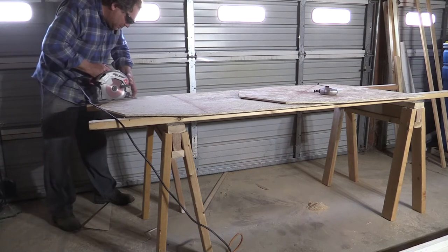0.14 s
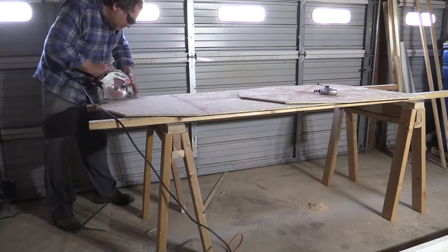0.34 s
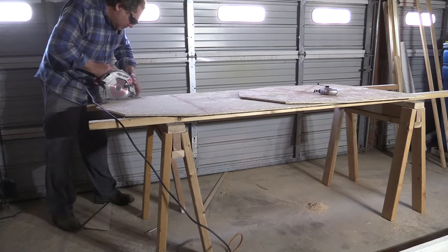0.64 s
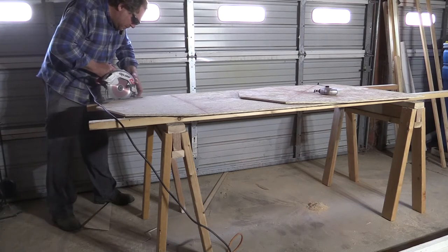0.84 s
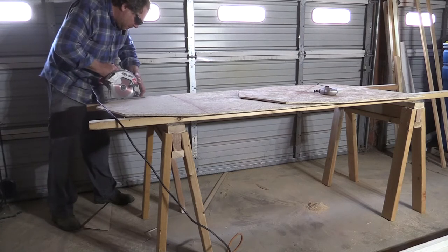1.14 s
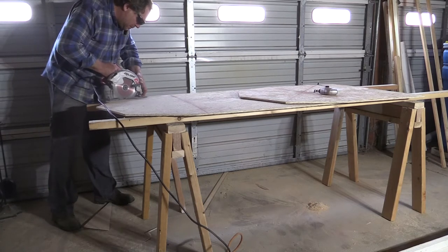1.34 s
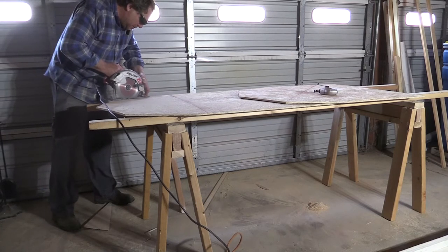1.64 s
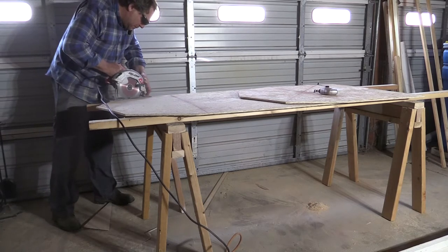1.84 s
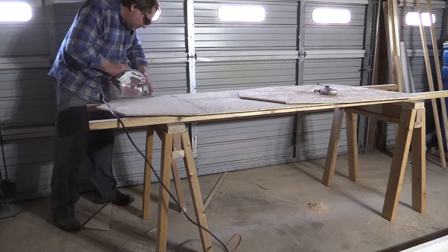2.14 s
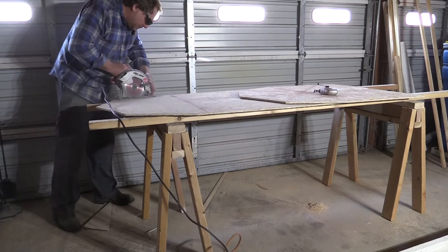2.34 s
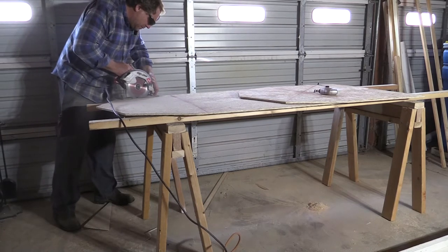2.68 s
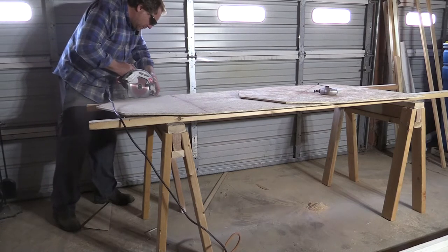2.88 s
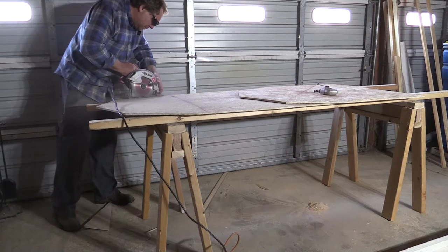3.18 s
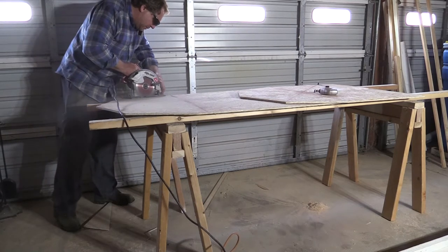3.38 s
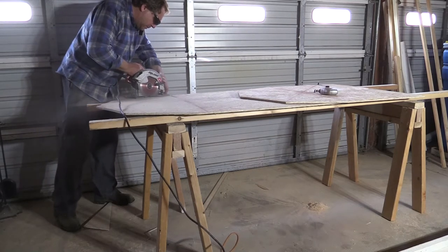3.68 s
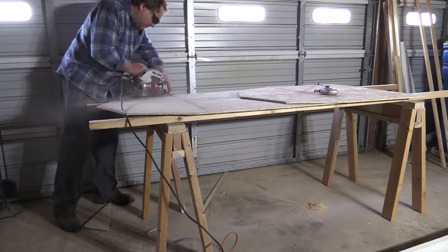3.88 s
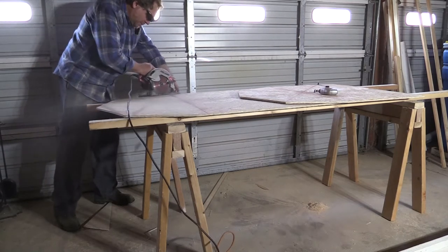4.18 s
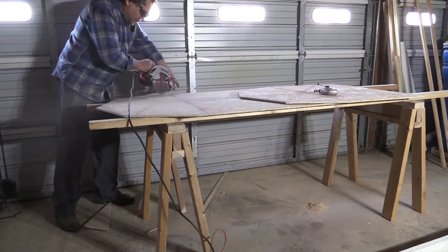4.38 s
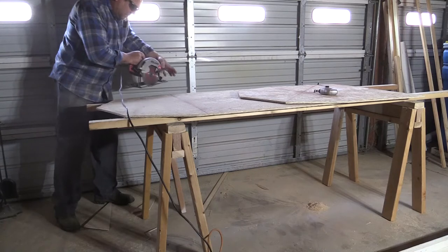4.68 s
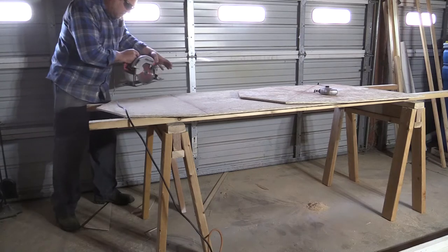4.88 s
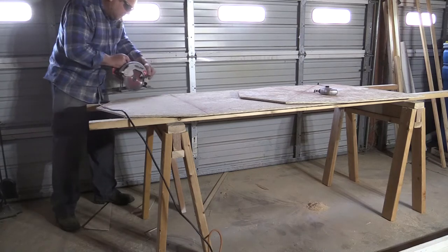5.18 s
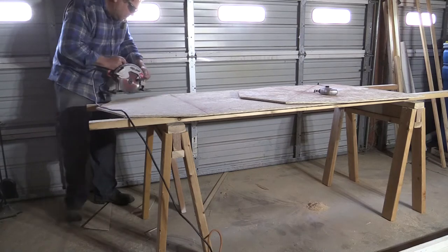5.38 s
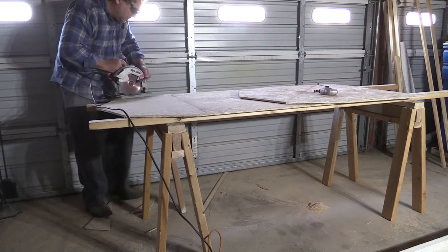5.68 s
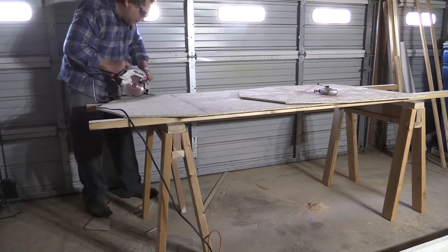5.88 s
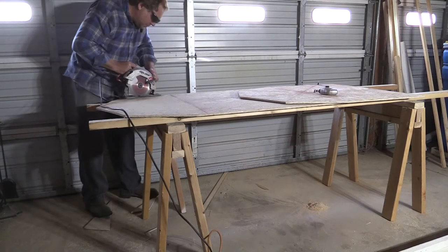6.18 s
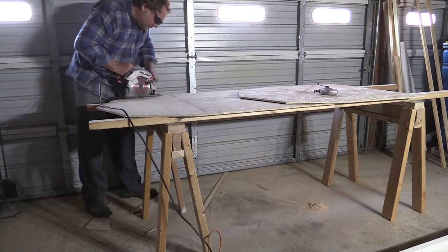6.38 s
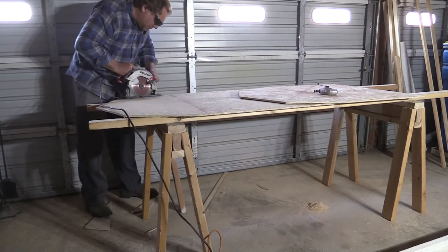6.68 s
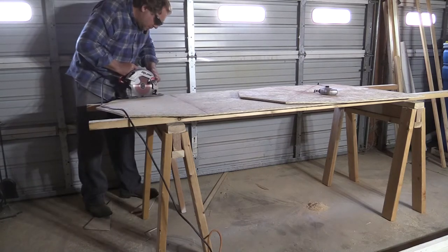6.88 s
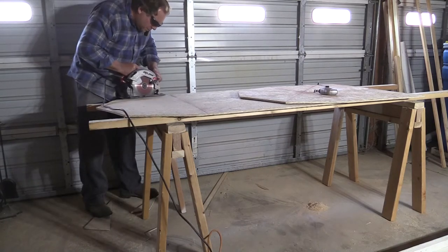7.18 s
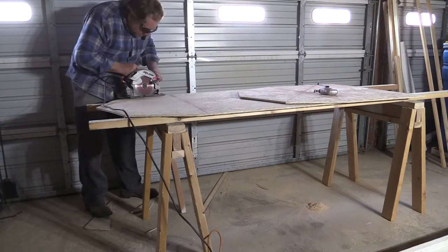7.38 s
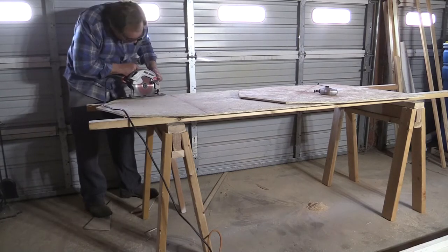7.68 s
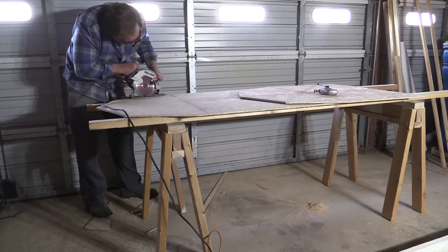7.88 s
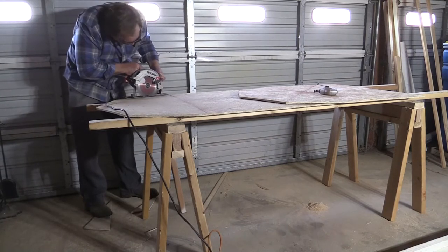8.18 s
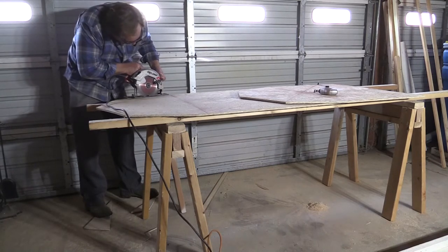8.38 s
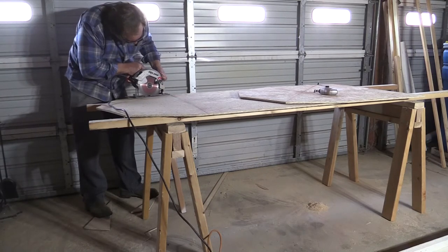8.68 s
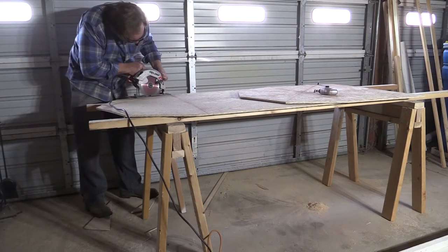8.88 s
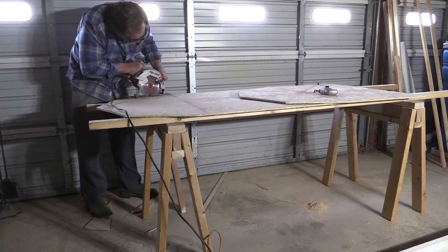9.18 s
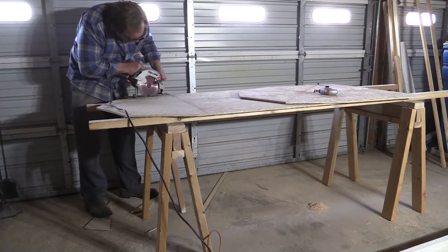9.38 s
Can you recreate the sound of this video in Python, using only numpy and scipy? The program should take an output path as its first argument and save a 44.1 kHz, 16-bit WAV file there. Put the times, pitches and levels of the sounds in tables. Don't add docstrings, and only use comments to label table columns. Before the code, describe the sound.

A circular saw tears loudly through a wooden panel on trestles, its pitch sagging under load. At about four seconds the motor is released and coasts down in a long falling whine with gear rattle and brush hiss. A few dull knocks follow, then two rasping brushes against wood leave the blade singing. The motor surges back and cuts again. Close stereo microphones, louder on the left, in a reverberant garage.

```python
import sys
import numpy as np
from scipy import signal
from scipy.fft import rfft, irfft, next_fast_len
from scipy.io import wavfile
from scipy.ndimage import uniform_filter1d, map_coordinates

SR = 44100
rng = np.random.default_rng(int(sys.argv[2]) if len(sys.argv) > 2 else 0)


def field_ratio(decibels):
    return 10 ** (np.asarray(decibels, dtype=float) / 20)


def unload_wav(signal):
    wavfile.write(
        sys.argv[1],
        SR,
        np.round(np.clip(np.atleast_2d(signal).T, -1, 1) * 32767).astype(np.int16),
    )


N = 420713
T = np.arange(N) / SR
HZ = np.fft.rfftfreq(next_fast_len(N + SR), 1 / SR)

POWER_OFF_S, POWER_ON_S = 4.2, 8.3
SECOND_KERF_S = 5
GEAR, TEETH, SECTORS = 49 / 9, 24, 4
DRAG_PER_S, FRICTION_HZ = .16, 204.7
SPIN_S, FREE_HZ, SPIN_UP_S = 8.237, 440, .525

# frequency in Hz, t60 in s.
ROOM_DECAY = [(200, .5), (1000, .45), (4000, .35), (12000, .22)]
# frequency in Hz, level in dB.
ROOM_LEVEL = [(100, -13), (300, -13.5), (600, -5), (2000, -3.5), (8000, -4), (14000, -1.5)]
# frequency in Hz, left minus right in dB.
LEFT_TILT = [(60, -1.5), (300, 5.5), (1000, 4), (4000, 3.5), (15000, 4)]
# time in s, gain in dB.
MIC_GAIN = [(0.0, -5.5), (1.0, -8), (4.28, -9), (5.3, -0.5), (5.9, 0), (6.5, -1.5), (6.6, -5), (6.9, -5),
            (7.25, -10.5), (7.6, -7.5), (8.1, -1.5), (8.27, -5), (8.35, -2.5), (8.75, -3), (9.54, -3.5)]

# frequency in Hz, width in Hz, level in dB.
TRESTLE_MODES = [(75, 30, -5), (125, 14, 0), (207, 64, 0)]
# centre in seconds, length in seconds, level in dB.
SHUDDERS = [
    (2.8, 4.0, -61),
    (5.61, 0.18, -49),
    (6.1, 0.97, -51),
    (7.09, .3, -57),
    (7.9, .6, -56),
    (8.47, .7, -48),
    (9.1, 1.1, -59),
]
# start in seconds, peak in dB, frequency in Hz, t60 in seconds.
SHOE_KNOCKS = [
    (5.6, -36, 250, .06),
    (5.85, -45, 240, .06),
    (6.001, -40, 180, .08),
]

# time in seconds, hum change in dB.
CURRENT = [
    (0.0, -12),
    (1.0, -10),
    (1.3, -1.5),
    (2.9, 1.5),
    (3.6, -1.5),
    (3.8, -9),
    (8.3, -4),
    (9.54, -8),
]
# time in seconds, speed in Hz.
SAG = [
    (0.0, 447.2),
    (0.6, 439.1),
    (1.2, 428.8),
    (1.8, 421.2),
    (2.4, 416.3),
    (3.1, 414.2),
    (4.0, 398.8),
    (4.23, 397.2),
]
# multiple of the armature speed, level against the draught in dB.
OVERTONES = [(6, -11), (16, -11), (24, -13), (32, -17), (36, -17), (48, -14), (64, -10), (72, -14)]
# frequency in Hz, level in dB.
VENT_COLOUR = [(1500, -44), (1900, -24), (2400, -26), (2900, -32), (4000, -35), (4700, -35), (5000, -24),
               (5400, -26)]
# frequency in Hz, width in Hz, level in dB.
VENT_MODES = [(2700, 50, 3), (2983, 40, 4), (3300, 80, 7), (3760, 80, 8), (4290, 60, 10)]
# frequency in Hz, width in Hz, level in dB.
FRAME_MODES = [(173, 6, -44), (248.5, 8, -45.5), (279, 13, -49.5), (315, 12, -36), (347, 8, -41),
               (403, 3, -41), (433, 9, -32)]
# frequency in Hz, level in dB per Hz.
DRAUGHT_COLOUR = [(40, -65), (160, -32), (400, -16), (630, -9), (1200, -12.5), (3000, -8), (5500, -18.5),
                  (9000, -22), (13000, -42.5)]
# frequency in Hz, level in dB per Hz.
TIP_COLOUR = [(4000, -32), (8000, -15.5), (12000, 3), (14000, -2), (15500, -25)]
# centre in seconds, length in seconds, level in dB.
STALL = (8.25, .16, -9)

# frequency in Hz, width in Hz, level in dB.
HOUSING_MODES = [(1090, 67, 0), (2127, 56, 1), (2970, 510, -8)]
# frequency in Hz, width in Hz, level in dB.
BRUSH_MODES = [(8870, 950, 4), (9530, 1500, 12)]
# centre in seconds, length in seconds, level in dB.
BRUSH_HISS = [
    (4.9, .6, -42),
    (5.85, 0.75, -32.5),
    (6.64, .3, -39),
    (7.03, .25, -32),
    (8.0, 1.3, -36),
]

# frequency in Hz, width in Hz, level in dB.
DISC_MODES = [(1669, 10, -5), (1809, 6, 0), (2137, 8, -4), (2326, 8, -3), (2525, 8, 1), (2961, 10, -4),
              (3634, 10, -9), (4560, 12, -14), (5540, 12, -9)]
# time in seconds, level in dB.
SONG_LEVEL = [
    (6.5, -45),
    (6.57, -52),
    (6.624, -36),
    (6.754, -36.5),
    (8.228, -36),
    (8.264, -47),
    (8.3, -28),
]
RING_HZ = (1668, 1809, 2128, 2328, 2525, 2961, 3198, 3634, 5530)
# centre in seconds, length in seconds, level in dB.
RINGS = [
    [(6.85, .7, -35), (7.55, 1.1, -40)],
    [(6.95, 1.1, -32), (7.5, .9, -33), (8.0, .8, -33)],
    [(6.8, .5, -35)],
    [(6.8, .5, -29), (7.85, .6, -35)],
    [(7.28, .5, -32), (7.8, .8, -37)],
    [(6.8, .45, -30)],
    [(4.45, .8, -37)],
    [(7.8, .4, -33)],
    [(7.45, .7, -44), (7.95, .6, -43)],
]

# start in s, end in s, bite in dB, change to the end in dB, release in dB per s.
CONTACTS = [
    (0.0, 4.23, -24.5, -0.5, 300),
    (6.542, 6.71, -18.5, -7, 150),
    (6.96, 7.1, -21, 1.2, 130),
    (8.12, 9.22, -26.5, 2.5, 160),
    (9.35, 9.6, -25.5, 1.7, 200),
]
# centre in s, length in s, extra bite, panel boom and guard ring in dB.
PUSHES = [(0.03, .14, -4.5, 3, -4), (0.193, 0.16, 2, 3, 2), (0.622, .3, 2, 6, -1),
          (0.858, 0.33, 2.5, 11, -6), (1.14, .3, -.4, -12, 3), (1.324, 0.1, 2.5, 12, -3),
          (1.685, .4, 2.5, -3, 1), (2.204, .8, 1.5, 10, 3.5), (2.76, 0.48, 0.8, 8, 1.5),
          (3.02, 0.28, 4.5, -8, 2), (3.33, 0.52, 2.2, 9, 4), (3.6, 0.38, 1.5, .4, 9), (3.8, .2, -1, 8, 4),
          (3.987, 0.29, 4, 2, 10), (4.137, 0.22, -0.3, 8, 6.5), (6.58, .25, .4, 12, 0),
          (7.052, .35, 0, 13, -3), (8.25, .15, 5, 3, 14.5), (8.35, 0.27, -1.5, 21, 10),
          (8.6, 0.15, 6.5, 8, 4), (8.83, .35, 1.5, 6, 8), (9.5, .3, .4, 8, 8), (2.86, .25, 3, .4, 3),
          (9.15, 0.46, 0.5, 7, 5)]
# frequency in Hz, level in dB per Hz.
CHIP_COLOUR = [(35, -73), (60, -72), (320, -14), (976, -12.5), (1480, 0.5), (1670, -6.5), (2910, -12),
               (3580, -5.5), (5450, -7.5), (10700, -13), (12900, -21), (15500, -37)]
# frequency in Hz, width in Hz, level in dB.
BLADE_MODES = [(1810, 30, 3), (2350, 40, 5), (2630, 80, 5), (3250, 50, 4), (4360, 30, 5), (4610, 50, -2),
               (5800, 50, 8), (5960, 30, 4), (6100, 30, 5), (6430, 50, 4), (7340, 50, 3), (9100, 50, 4),
               (10320, 80, 3), (11300, 120, 3)]
# frequency in Hz, width in Hz, level in dB.
SLOW_BLADE_MODES = [(2960, 40, 6), (3920, 30, 6), (4460, 70, 9), (5560, 40, 10), (6300, 60, 9),
                    (7240, 50, 7), (8180, 60, 6), (11100, 150, 6)]
# frequency in Hz, width in Hz, level in dB.
PANEL_MODES = [(1287, 110, -17.5), (1440, 34, 19), (1568, 25, 1)]
# frequency in Hz, width in Hz, level in dB.
EDGE_PANEL_MODES = [(1319, 31, 1), (1660, 60, -6)]
# frequency in Hz, width in Hz, level in dB.
GUARD_MODES = [(3527, 99, 6.5), (3720, 200, -3)]
TURNS = (1, 2, 4, 5, 6, 8, 10, 12, 18, 19, 20, 24)
# centre in seconds, length in seconds, level in dB.
TURN_TONES = [
    [(1.2, 3.0, -71), (3.0, 2.5, -72)],
    [(2.0, 3.5, -62)],
    [(1.2, .5, -54), (3.7, 1.5, -56)],
    [(3.6, 1.1, -47)],
    [(.75, .6, -46), (2.3, .6, -44), (3.7, .5, -48)],
    [(1.9, .9, -43)],
    [(2.6, 1.8, -45)],
    [(3.91, .25, -33.5)],
    [(.54, .45, -25), (.9, 0.33, -32), (1.3, .4, -37), (2.3, .6, -35), (4.14, 0.26, -32)],
    [(1.3, .5, -27.5), (1.95, .8, -38), (2.6, 0.55, -35), (3.2, .5, -38)],
    [(1.7, .7, -38), (2.75, 0.42, -29), (3.0, 0.53, -29.5), (3.5, .5, -30)],
    [(.54, .3, -39), (1.1, .5, -36), (1.8, 0.28, -38), (2.7, .4, -36), (3.25, .45, -23)],
]


def evened(x):
    return x / np.sqrt(np.mean(x ** 2) + 1e-20)


def read(points, hz):
    f, value = np.transpose(points)
    return np.interp(np.log(hz + 1), np.log(f + 1), value)


def level_curve(rows):
    s, db = np.transpose(rows)
    return uniform_filter1d(field_ratio(np.interp(T, s, db, left=-120, right=-120)), size=300)


def bump(s, length):
    return np.cos(np.pi * np.clip((T - s) / length, -.5, .5)) ** 2


def swells(rows):
    return sum(field_ratio(db) * bump(s, length) for s, length, db in rows)


def colour(x, gain):
    size = 2 * (len(HZ) - 1)
    return irfft(rfft(x, size) * gain, size)[..., :N]


def modes(table):
    return sum(field_ratio(db) / (1 + 1j * (HZ ** 2 - hz ** 2) / ((HZ + 1) * abs(width))) for hz, width, db in table)


def noise(gain):
    return evened(colour(rng.standard_normal(N), gain))


def glide(hz, share):
    turns = np.cumsum(hz) / SR
    slow = rng.standard_normal((2, int(turns[-1] * share) + 3))
    a, b = (map_coordinates(row, [turns * share], order=3) for row in slow)
    return evened(a * np.cos(2 * np.pi * turns) + b * np.sin(2 * np.pi * turns))


def drift(rate, count):
    steps = rng.standard_normal((count, int(N / SR * rate) + 4))
    return np.array([map_coordinates(row, [T[::64] * rate], order=3) for row in steps])


def held(rows):
    return np.repeat(rows, 64, axis=-1)[..., :N]


def garage(x):
    taps = np.zeros((2, SR))
    at = np.arange(300, SR - 20, 20) + rng.integers(0, 20, (2, (SR - 301) // 20))
    np.put_along_axis(taps, at, rng.choice([-1., 1.], at.shape), axis=1)
    hz, t, z = signal.stft(taps, SR, nperseg=256)
    t60 = read(ROOM_DECAY, hz)[:, None]
    tail = signal.istft(z * field_ratio(-60 * t / t60) * np.sqrt(1 / t60), SR, nperseg=256)[1]
    wet_db = read(ROOM_LEVEL, HZ)
    echoes = rfft(tail[:, :SR] / np.linalg.norm(tail[0]), 2 * (len(HZ) - 1)) * field_ratio(wet_db)
    return colour(x, (1 + echoes) / np.sqrt(1 + field_ratio(2 * wet_db)))


def knocks():
    rumble_db = -68
    out = (field_ratio(rumble_db) + swells(SHUDDERS)) * noise(modes(TRESTLE_MODES) ** 2)
    for s, db, hz, t60 in SHOE_KNOCKS:
        t = np.maximum(T - s, 0)
        out += field_ratio(db - 60 * t / t60) * np.sin(2 * np.pi * hz * t) * (1 - np.exp(-t / 0.0031))
    return out


def hum():
    hum_hz, hum_db, buzz_db = 120, -61, -56
    surge_db, surge_s = -40, .2
    powered = uniform_filter1d(1. * ((T < POWER_OFF_S) | (T > POWER_ON_S)), size=1000)
    restarted = T > POWER_OFF_S
    surge = field_ratio(surge_db) * np.exp(-abs(T - POWER_ON_S) / surge_s) * restarted
    pull = [np.sin(2 * np.pi * k * hum_hz * T + k * k) for k in range(1, 5)]
    steady = field_ratio(hum_db) * level_curve(CURRENT) * pull[0]
    buzz = field_ratio(buzz_db) * restarted * pull[1]
    inrush = surge * (.5 * pull[0] + pull[1] + 2.2 * pull[2] + 0.97 * pull[3])
    return powered * (steady + buzz + inrush)


def armature():
    off_s, off_hz = SAG[-1]
    coast = (off_hz + FRICTION_HZ) * np.exp(-DRAG_PER_S * (np.minimum(T, SPIN_S) - off_s)) - FRICTION_HZ
    climb = FREE_HZ - (FREE_HZ - coast) * np.exp(-(T - SPIN_S) / SPIN_UP_S)
    return np.where(T < off_s, np.interp(T, *np.transpose(SAG)), np.where(T < SPIN_S, coast, climb))


def motor(speed, gain):
    air_db, restart_whine_db, restart_shake_db = -28.5, -4, 3
    play = .005 * held(drift(40.0, count=1)[0])
    angle = 2 * np.pi * np.cumsum(speed) / SR + uniform_filter1d(play, size=64) * np.pi
    restarted = T > POWER_ON_S
    flutter = field_ratio(4.2 * held(drift(20.0, count=len(OVERTONES) + 1)))
    whine = np.sqrt(2) * gain * np.where(restarted, field_ratio(restart_whine_db), 1)
    whine = whine * flutter[0] ** .65 * np.sin(12 * angle)
    tones = colour(whine, field_ratio(read(VENT_COLOUR, HZ)) * (1 + modes(VENT_MODES)))
    unbalance = np.where(restarted, field_ratio(restart_shake_db), 1) * gain * np.sin(angle)
    tones = tones + colour(unbalance, modes(FRAME_MODES))
    stall_s, stall_length, stall_db = STALL
    air = field_ratio(air_db + stall_db * bump(stall_s, stall_length)) * gain
    for (k, db), wobble in zip(OVERTONES, flutter[1:]):
        vent = 1 / (1 + (k * speed / 10600) ** 10)
        tones = tones + field_ratio(db) * air * wobble * vent * np.sin(round(k) * angle)
    draught = noise(field_ratio(read(DRAUGHT_COLOUR, HZ)))
    tips = (speed / speed.max()) ** 5
    rush = field_ratio(-14.0) * tips * noise(field_ratio(read(TIP_COLOUR, HZ)))
    return tones + field_ratio(6.5) * air * (draught + rush)


def gears(speed, gain):
    mesh_db, double_db, double_db_per_octave = -20.5, -24, -22
    loose = gain * uniform_filter1d(1. * (T > POWER_OFF_S) * (T < POWER_ON_S), size=2000)
    mesh = field_ratio(mesh_db) * loose
    double = loose * field_ratio(double_db + double_db_per_octave * np.log2(speed / speed.min()))
    rattle = field_ratio(-6.0) * mesh * glide(9.2 * speed, .42) + double * glide(17.9 * speed, 0.15)
    hiss = field_ratio(-4.0) * swells(BRUSH_HISS) * noise(modes(BRUSH_MODES) ** 3)
    return colour(rattle, 1 + modes(HOUSING_MODES)) + hiss


def blade_song():
    disc = modes(DISC_MODES) / (1 + (HZ / 6500) ** 6)
    clear = np.array([swells(rows) for rows in RINGS]) * np.sin(2 * np.pi * np.outer(RING_HZ, T))
    return field_ratio(3.0) * level_curve(SONG_LEVEL) * noise(disc) + np.sqrt(2) * clear.sum(axis=0)


def contact():
    rise_s, boom_db, ring_db = .01, -8, -5.5
    bite = 0
    for start, end, db, change, release in CONTACTS:
        along = np.clip((T - start) / (end - start), 0, 1)
        rise = np.clip((T - start) / rise_s, 0, 1)
        bite = bite + rise * field_ratio(db + change * along - release * np.maximum(T - end, 0))
    extra = sum(np.outer(more, bump(s, length)) for s, length, *more in PUSHES)
    return bite * field_ratio(extra + np.array([[0], [boom_db], [ring_db]]))


def teeth(speed):
    even, sector, single, wander = .3, 0.55, 0.77, 0.71
    shift = .12
    passed = np.cumsum(speed) / SR / GEAR * TEETH
    count = np.arange(1, int(passed[-1]) - 1)
    tooth = count % TEETH
    alike, own = rng.standard_normal((2, 2, TEETH))
    set_of = sector * alike[:, tooth % (TEETH // SECTORS)] + single * own[:, tooth]
    at = np.interp(count + shift * set_of[1], passed, np.arange(N))
    first = at.astype(int)
    size = even + set_of[0] + wander * drift(5.0, count=TEETH)[tooth, first // 64]
    clicks = np.zeros(N + 8)
    for k in range(-3, 5):
        np.add.at(clicks, np.maximum(first + k, 0), size * np.sinc(first + k - at))
    fibres = field_ratio(2.0 * np.minimum(rng.exponential(size=N), 4.0)) * rng.standard_normal(N)
    return evened(clicks[:N] - clicks.mean()) + evened(fibres)


def cutting(speed):
    drive = teeth(speed)
    bite, boom, ring = contact()
    chip_gain = field_ratio(read(CHIP_COLOUR, HZ))
    driven = evened(colour(drive, chip_gain * (1 + modes(BLADE_MODES))))
    brushing = evened(colour(drive, chip_gain * (1 + modes(SLOW_BLADE_MODES))))
    brushing = colour(brushing, 1 / (1 + (HZ / 16000) ** 4))
    chips = np.where((T < SECOND_KERF_S) | (T > POWER_ON_S), driven, brushing)
    chips = chips * field_ratio(1.4 * held(drift(24.0, count=1)[0]))
    first_kerf = evened(colour(drive, modes(PANEL_MODES)))
    second_kerf = evened(colour(drive, modes(EDGE_PANEL_MODES)))
    panel = np.where(T < SECOND_KERF_S, first_kerf, second_kerf)
    guard = evened(colour(drive, modes(GUARD_MODES)))
    angle = 2 * np.pi * np.cumsum(speed) / SR / GEAR
    turn_gains = np.array([swells(rows) for rows in TURN_TONES])
    tones = field_ratio(2.5) * (turn_gains * np.sin(np.outer(np.round(TURNS), angle))).sum(axis=0)
    return field_ratio(2.0) * bite * chips + field_ratio(-8.5) * boom * panel + field_ratio(-2.0) * ring * guard + tones


def scene():
    speed, gain = armature(), level_curve(MIC_GAIN)
    saw = cutting(speed) + blade_song() + motor(speed, gain) + gears(speed, gain)
    return garage(saw + hum() + knocks())


def low_pass(x):
    return signal.sosfilt(signal.butter(12, 15670, fs=SR, output="sos"), x)


def record(dry):
    ceiling = .56
    tilt = read(LEFT_TILT, HZ) / 2
    rounded = ceiling * np.tanh(field_ratio(1.5) * dry / ceiling)
    bass_cut = 1 / (1 + (72 / (HZ + 1)) ** 3)
    return low_pass(colour(rounded, field_ratio(np.array([tilt, -tilt])) * bass_cut))


dry = scene()
out = record(dry)
unload_wav(out)
```